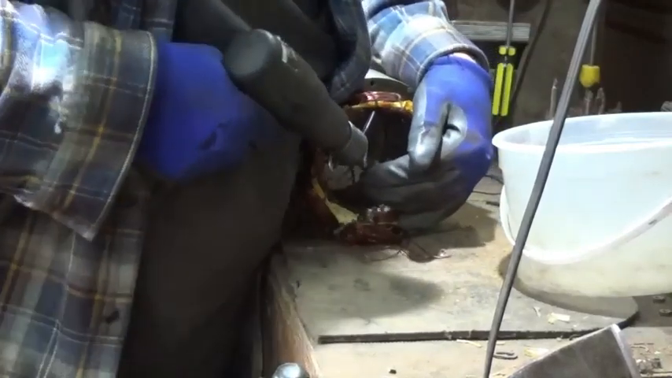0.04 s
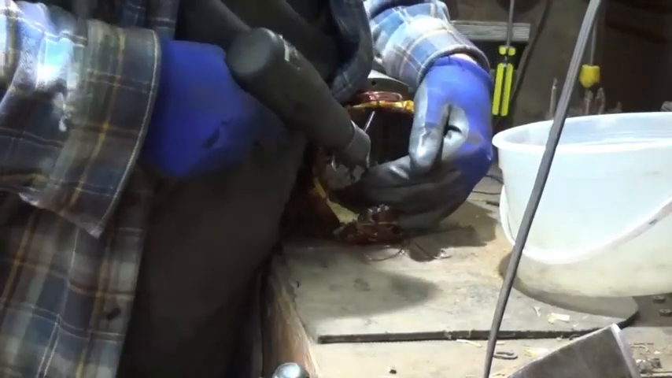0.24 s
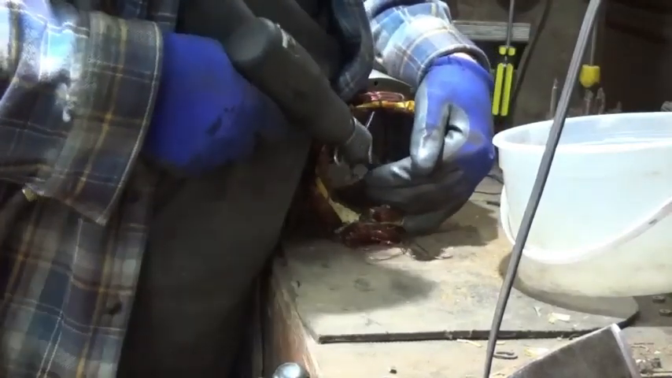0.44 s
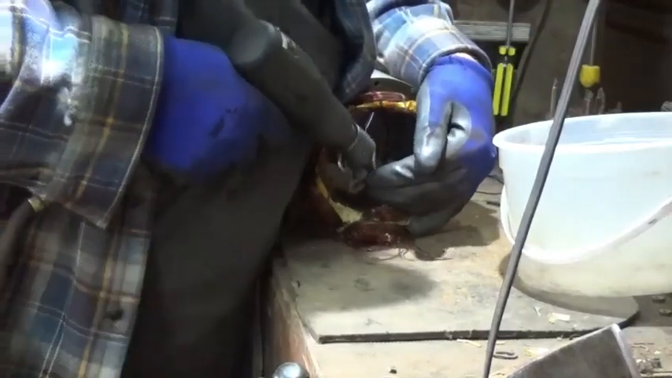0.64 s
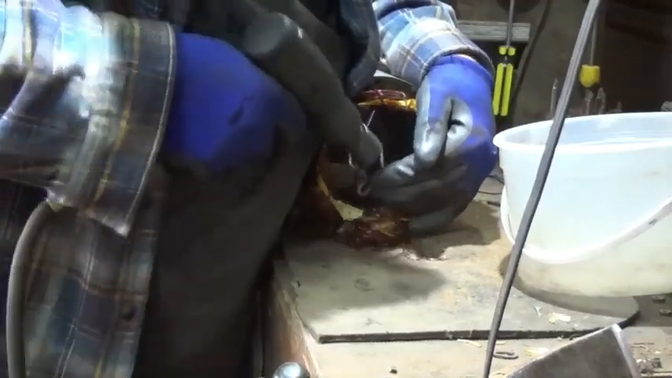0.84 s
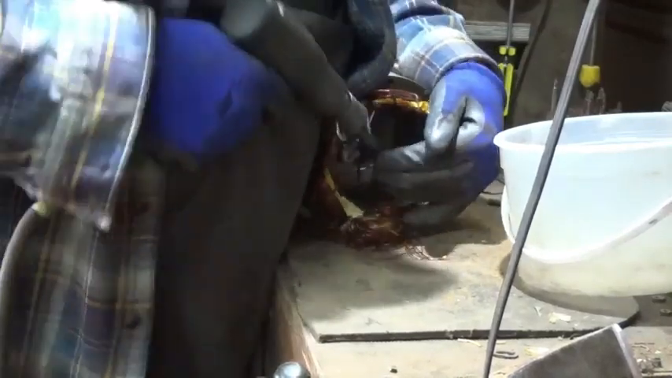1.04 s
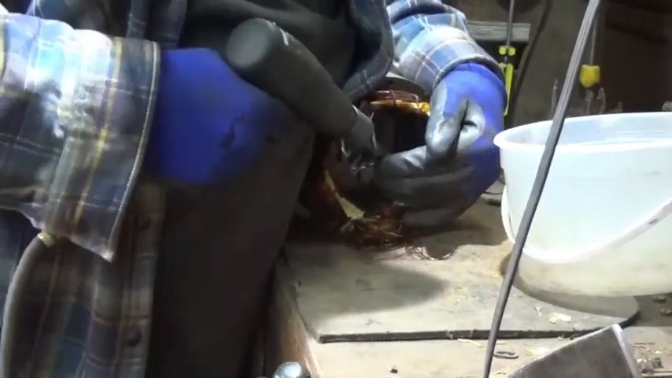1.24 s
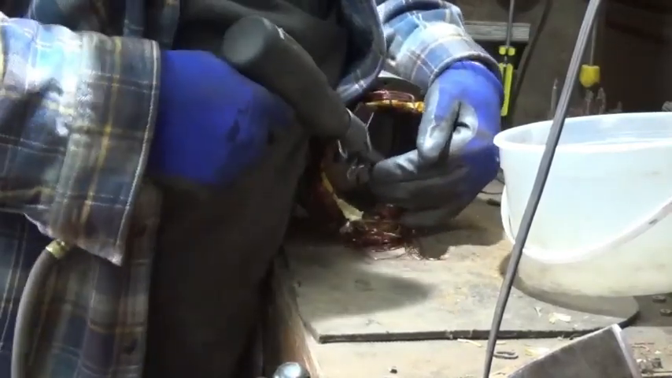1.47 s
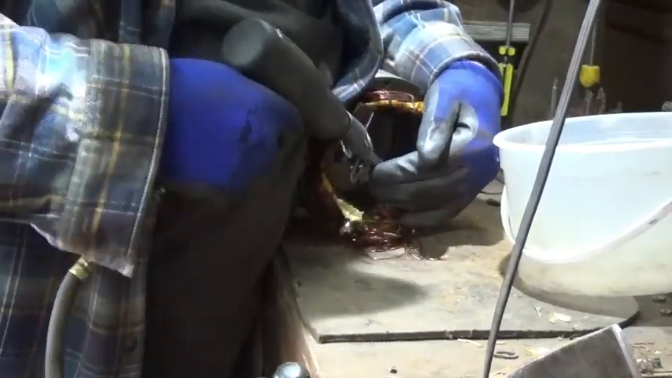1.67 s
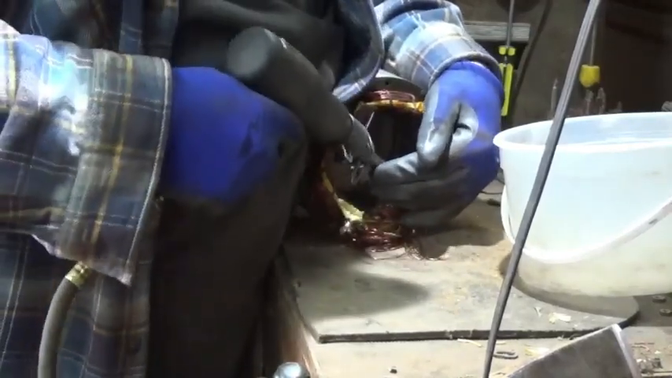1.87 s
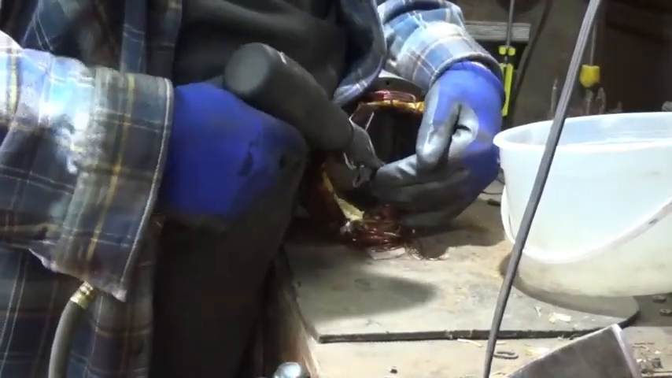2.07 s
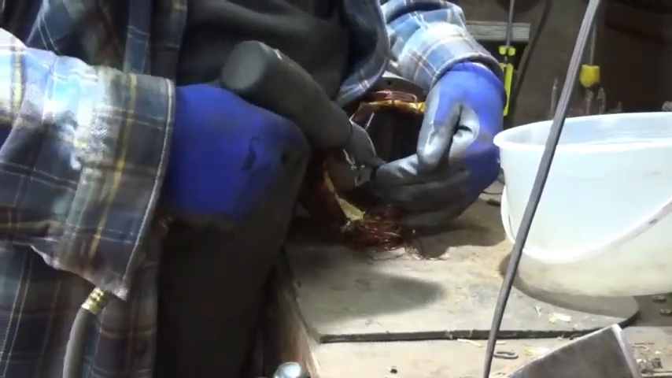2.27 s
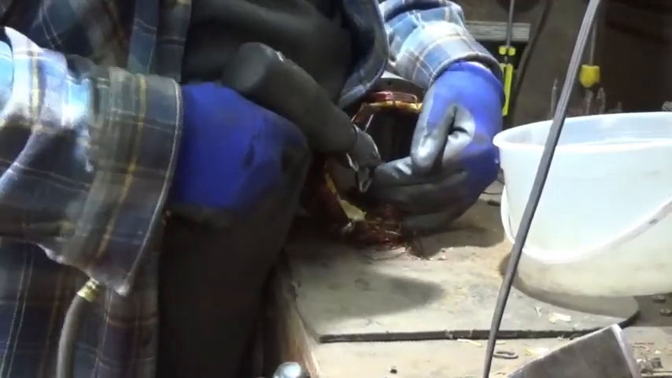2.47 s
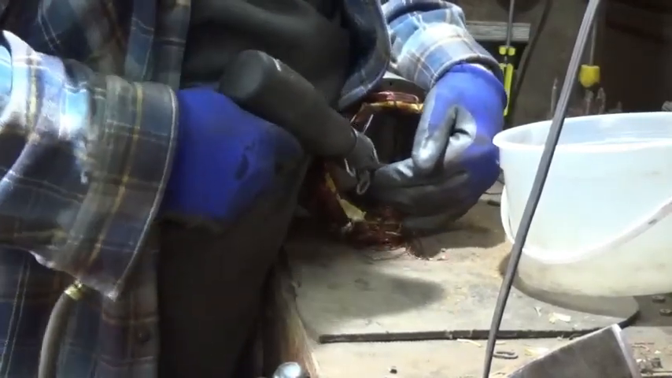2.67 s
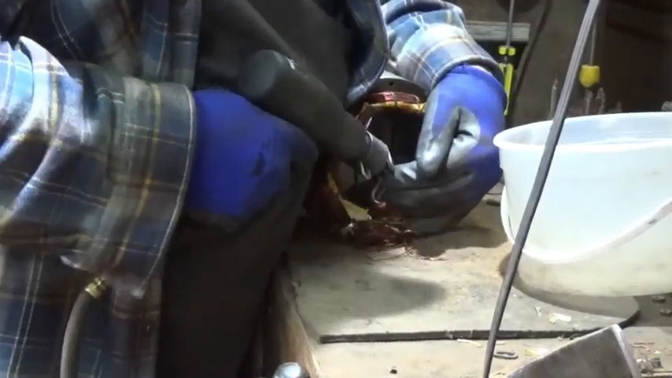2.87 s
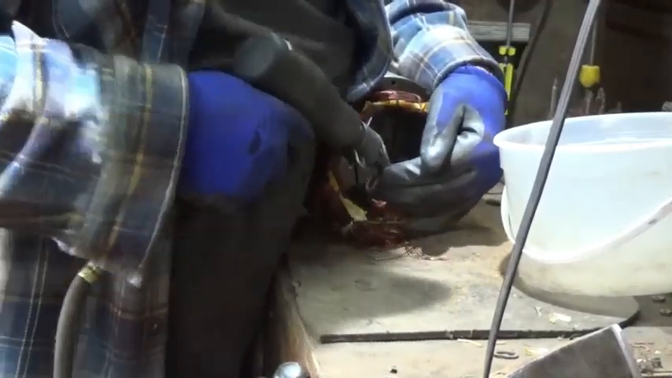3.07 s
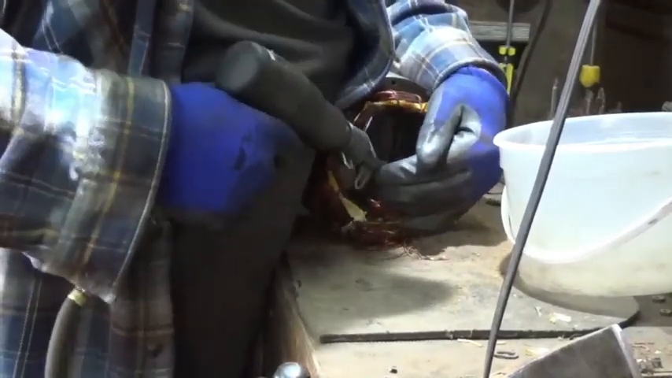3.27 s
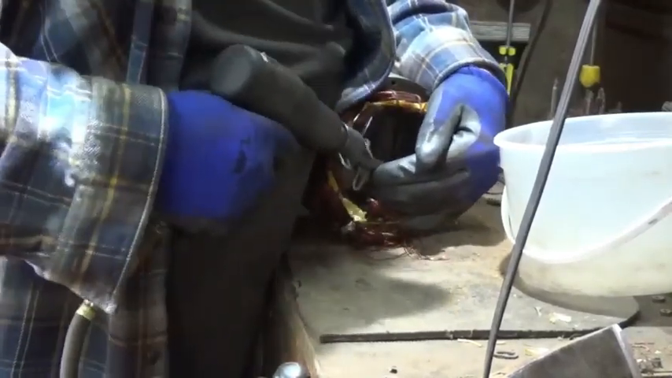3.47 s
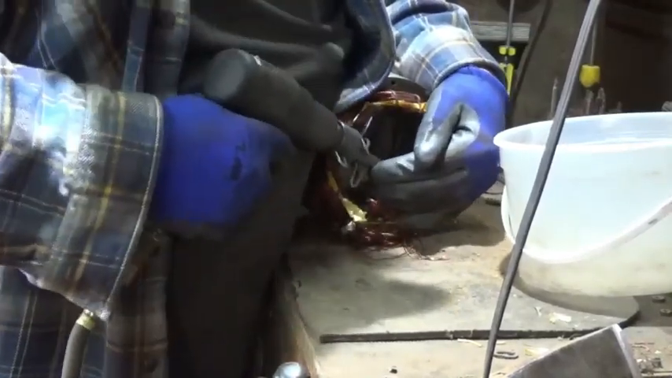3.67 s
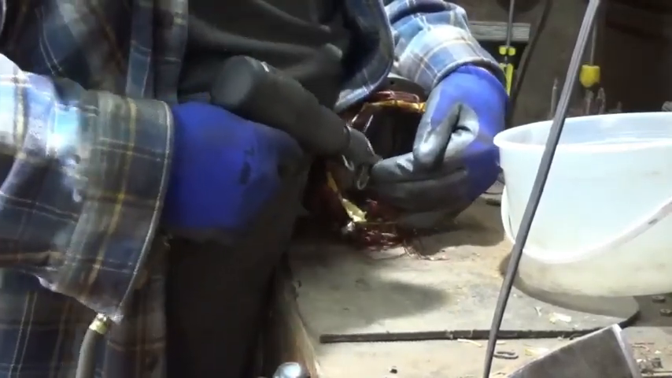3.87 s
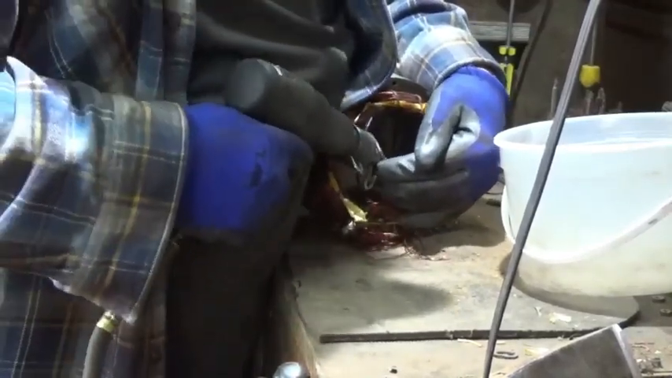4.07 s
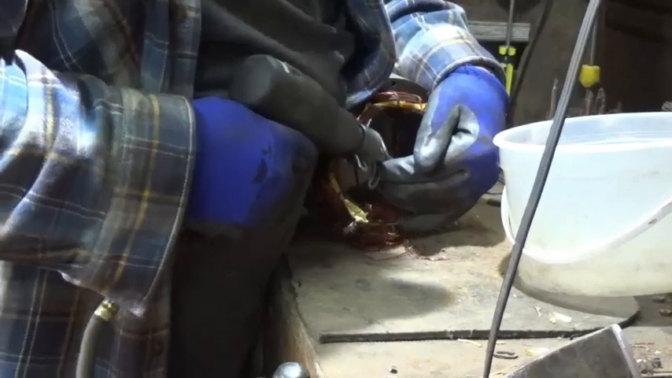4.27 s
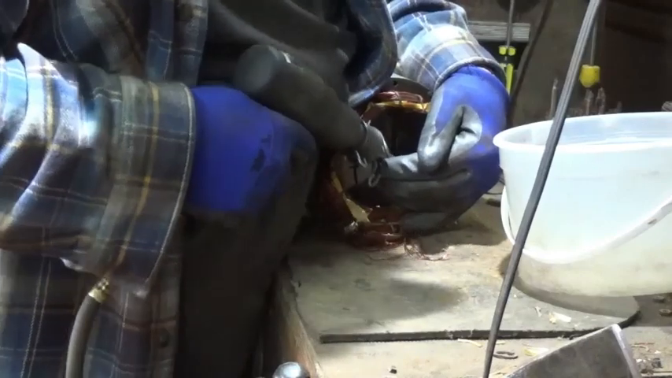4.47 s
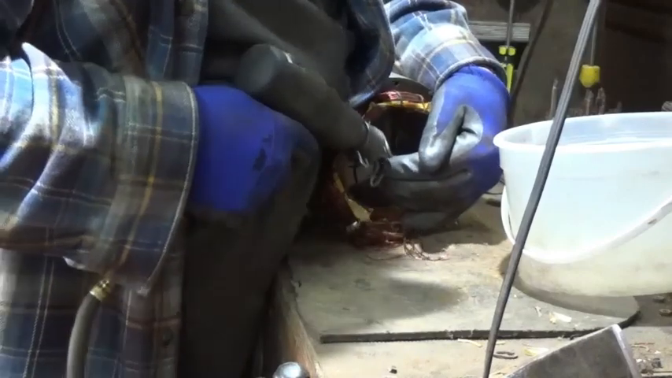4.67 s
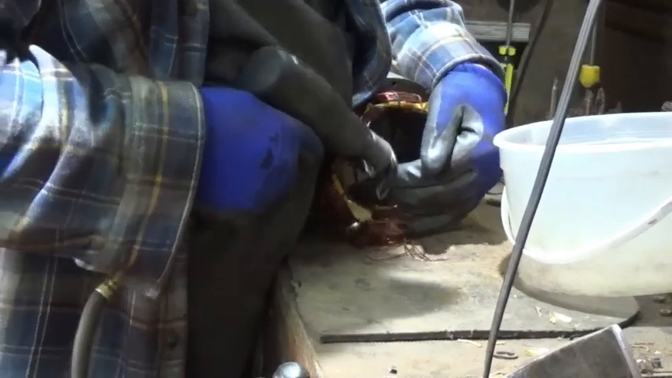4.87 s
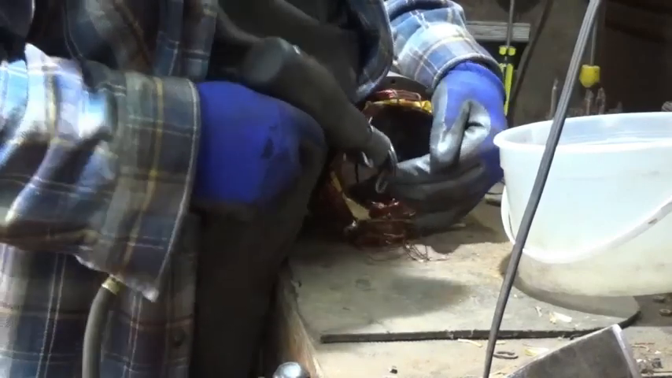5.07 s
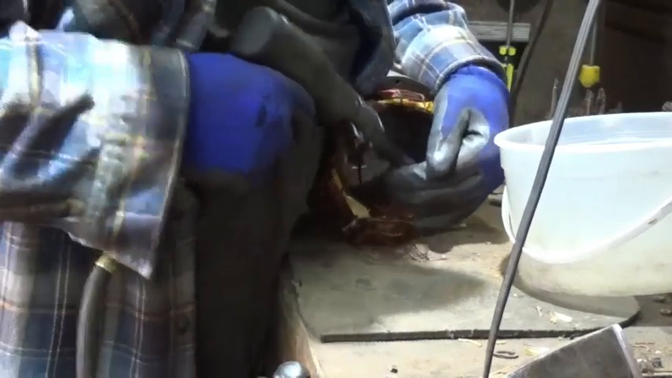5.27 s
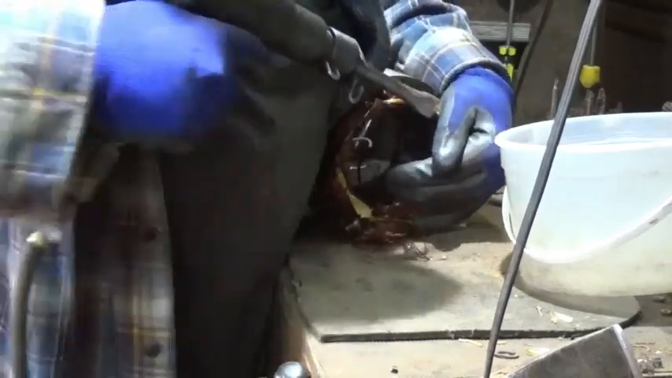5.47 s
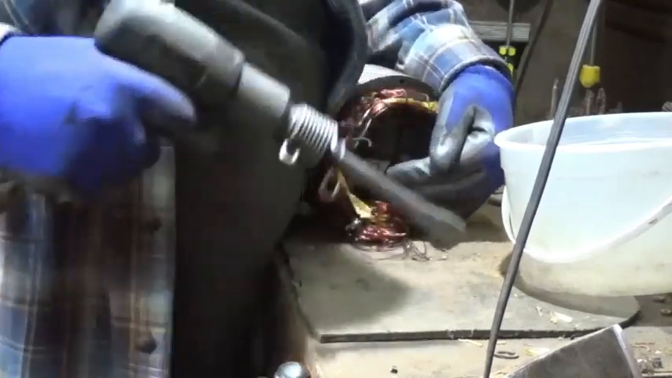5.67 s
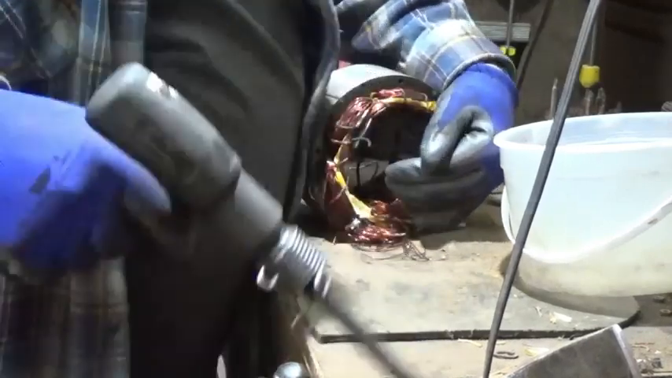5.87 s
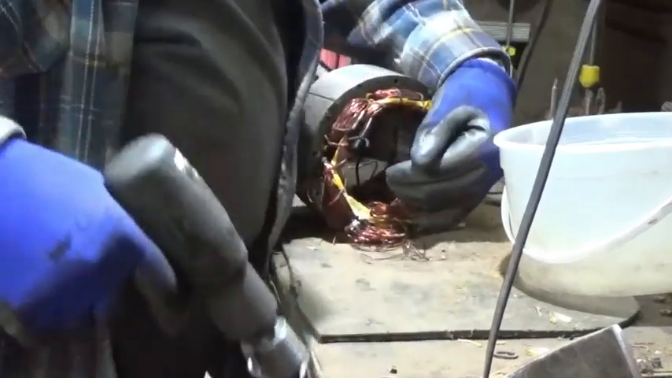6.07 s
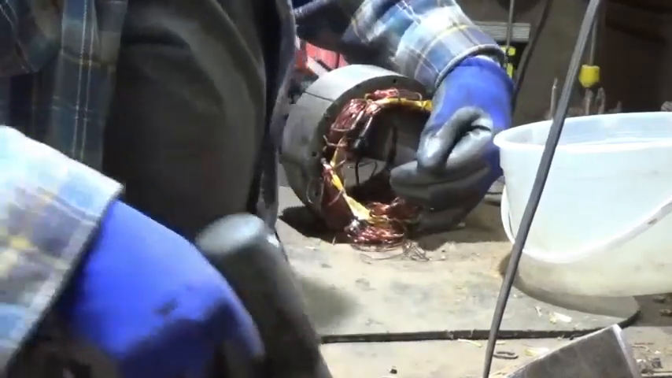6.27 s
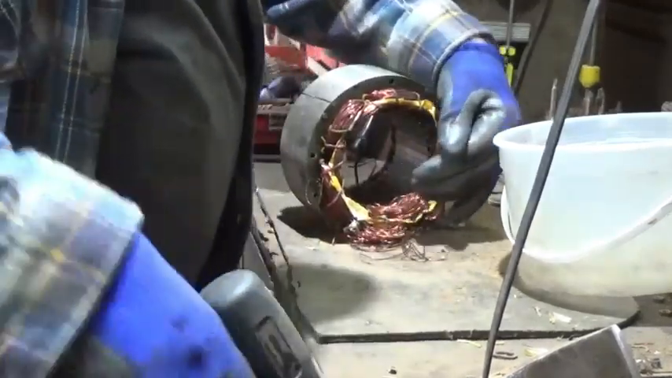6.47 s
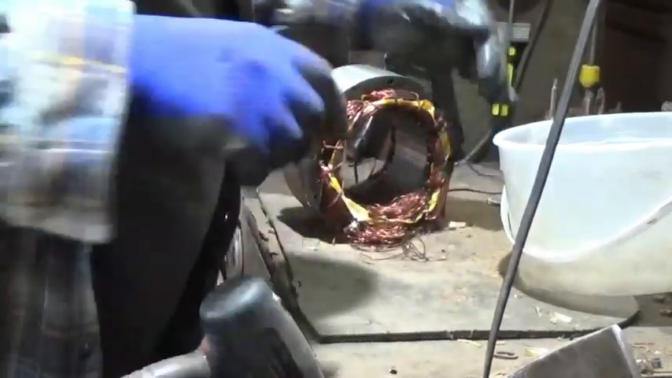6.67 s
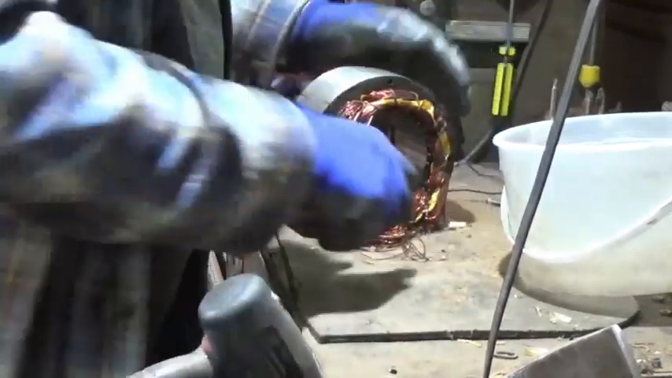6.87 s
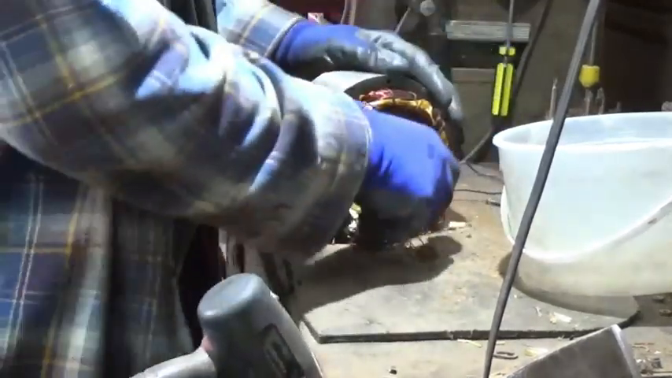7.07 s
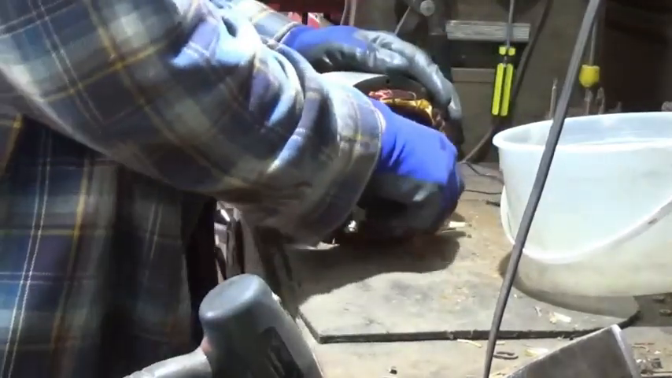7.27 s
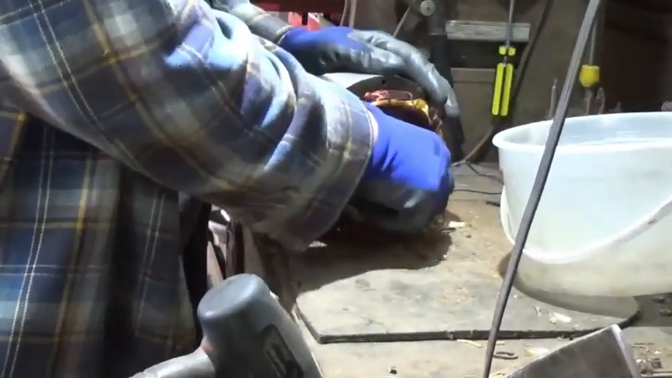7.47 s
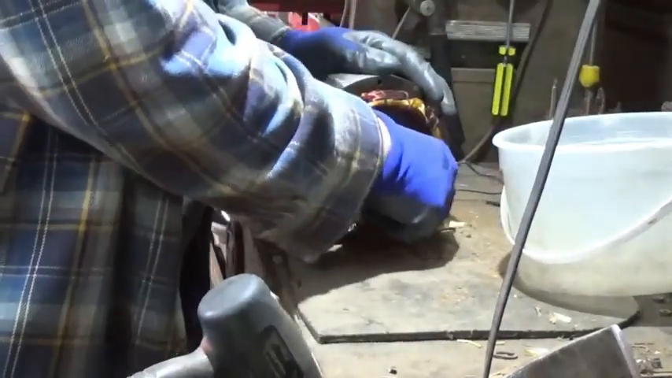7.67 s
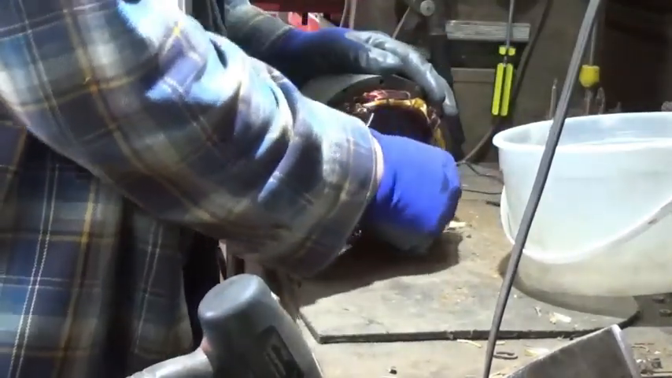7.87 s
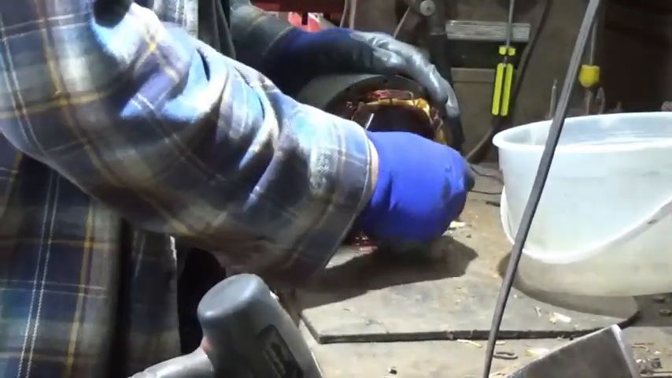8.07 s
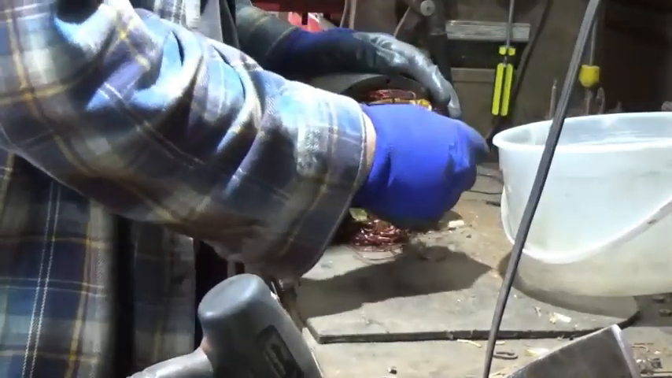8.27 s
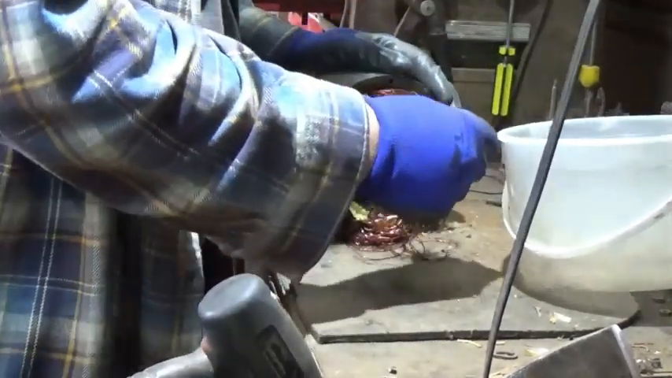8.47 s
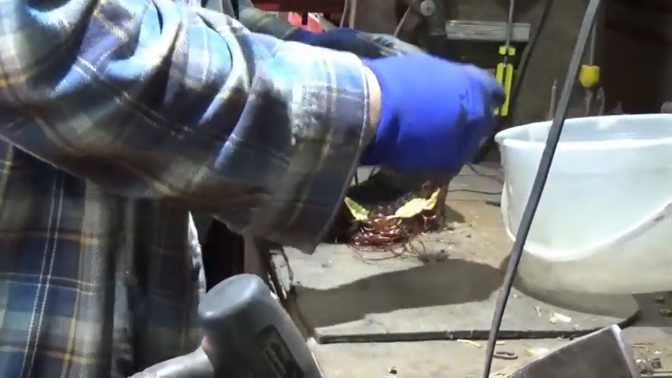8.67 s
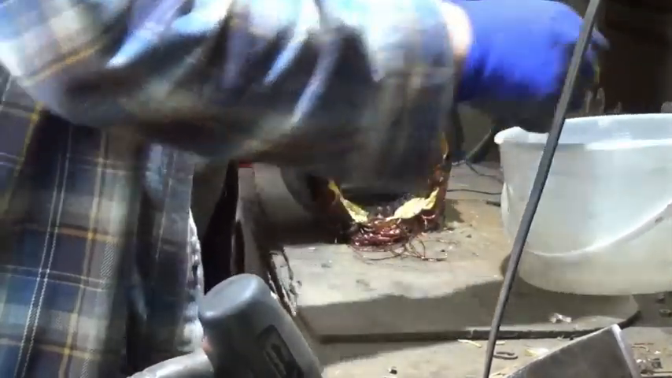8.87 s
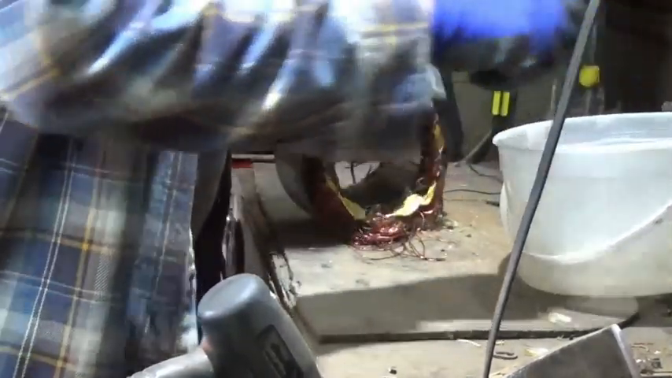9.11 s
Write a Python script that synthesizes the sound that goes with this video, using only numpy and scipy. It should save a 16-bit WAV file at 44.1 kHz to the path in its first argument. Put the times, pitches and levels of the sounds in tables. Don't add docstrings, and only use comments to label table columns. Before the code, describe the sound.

Close, slightly dull-topped capture at a workbench: a loud air chisel buzzes at about forty blows a second, first a long burst, then two short ones and another long one, each ending in a quick air sigh. Behind it a low, throbbing compressor with a thin whine swells steadily in the gaps. Later come hard tool knocks, a brief drag, dry wire rustling, and strands hitting a hollow plastic bucket.

```python
import sys
import numpy as np
from scipy import signal
from scipy.fft import rfft, irfft, next_fast_len
from scipy.io import wavfile
from scipy.ndimage import uniform_filter1d

SR = 44100
rng = np.random.default_rng(int(sys.argv[2]) if len(sys.argv) > 2 else 0)


def magnitude_from_level(level_db):
    exponent = np.asarray(level_db, float) / 20
    return 10 ** exponent


def to_wav(sig):
    pcm = np.clip(np.atleast_2d(sig), -1, 1) * 32767
    pcm = np.round(pcm).astype(np.int16)
    wavfile.write(sys.argv[1], SR, pcm.T)


N = 403074
T = np.arange(N) / SR

# pitch in Hz, level in dB.
FAN_HUM = [(97.5, -32), (195, -8)]
# multiple of crank speed, width in Hz, level in dB.
VALVE_WHINES = [(85, 170, -26.5), (152, 200, -30.5), (251, 220, -32.5)]
# frequency in Hz, level in dB per Hz.
COMPRESSOR_WASH = [(15, -39), (25, -23), (117, -21), (167, -11.5), (265, -3), (317, -10), (617, -12.5),
                   (862, -16.5), (2280, -24.5), (3630, -25), (3920, -24.5), (8900, -34.5), (10600, -43),
                   (11500, -54), (15000, -103), (22000, -120)]
CRANK_ORDERS = [-32, -18.5, -19, -8, 2.5, -2.5, -10, -7, -4, -11, -24, -7, -4.5, -11, -4, -15, -13, -8,
                -18.5, -26.5, -24, -23, -21.5, -17.5, -13.5, -15.5, -15, -20, -18, -22, -17, -23, -23, -28,
                -24, -28, -30, -26, -28, -25]
# frequency in Hz, width in Hz, depth in dB.
ROOM_NODES = [(137.1, 4.4, 17), (176.94, 7.9, 17), (205.6, 2.5, 13), (273, 4, 15), (318.7, 4.4, 14),
              (427, 5.5, 15), (448.3, 15.6, 11.5), (517.7, 8.4, 21), (591, 12, 20), (618.4, 10.5, 21),
              (850, 4.9, -1), (894, 12, 5), (925, 28, 11.5), (235.5, 3.1, 15)]
# frequency in Hz, width in Hz, depth in dB.
REED_ROOM_NODES = [(3627, 12, 20), (3597, 7, 18), (3586, 7, 9), (3561, 7, 16), (3496, 6, 12), (3575, 30, 2)]
# frequency in Hz, time to die by 60 dB in seconds.
ROOM_DECAY = [(200, 0.35), (1000, 0.25), (4000, 0.23), (10000, 0.12)]
# frequency in Hz, side minus mid in dB.
STEREO_WIDTH = [(60, -32), (140, -29.5), (350, -23.5), (830, -13.5), (2000, -10.5), (4810, -9.5),
                (11600, -1)]
# frequency in Hz, left minus right in dB.
STEREO_LEAN = [(60, 0.69), (220, 0.74), (830, 2), (3100, 0.6), (11600, 0.0)]
# time in seconds, peak level in dB, centre frequency in Hz.
GRIT_TICKS = [(0.8573, -27.5, 5800), (0.8833, -27, 9500), (0.967, -38, 5530), (1.261, -37, 5520),
              (1.3574, -35.5, 4200), (3.022, -30, 5860), (3.41, -36, 5320), (3.4296, -41, 5350),
              (5.237, -32, 5900), (7.5435, -27, 4840), (7.6256, -43, 8540), (7.6874, -36, 5060),
              (7.733, -34, 7050), (7.7624, -34, 5690), (7.7892, -35, 6190), (7.8251, -36, 6300),
              (7.86, -39, 5060), (7.9039, -36, 4530), (7.9794, -31, 5690), (8.0264, -34, 5290),
              (9.0803, -25, 4100)]
# time in seconds, level in dB.
WIRE_RUSTLE = [
    (7.45, -64),
    (7.532, -56),
    (7.542, -46),
    (7.568, -60),
    (7.752, -48.5),
    (8.032, -49.5),
    (8.072, -64),
    (8.29, -65),
    (8.3, -46),
]
# time in seconds, level in dB.
WIRE_DROP = [
    (8.982, -19),
    (8.992, -18.5),
    (9.022, -22),
    (9.046, -40.5),
    (9.14, -35),
]
# frequency in Hz, level in dB, time to die by 60 dB in seconds.
BUCKET_WALL = [(620, 6, 0.045), (960, 3, 0.48), (2060, -6, 0.33), (3000, -22, 0.23), (3560, -29, 0.45),
               (3600, -67, 0.16), (6000, -4, 0.11), (8705, -65, 0.13)]
# time in seconds, level in dB, ring in Hz.
TOOL_SCRAPE = [
    (6.13, -52, 2400),
    (6.208, -41.5, 2380),
    (6.28, -31, 2900),
    (6.305, -40, 3050),
    (6.32, -50, 3050),
]
# time in seconds, peak level in dB, weaker ring in Hz, stronger ring in Hz,
# bass over treble in dB.
TOOL_TAPS = [(2.316, -21.5, 9900, 5910, -28), (2.326, -16.5, 3300, 6090, -21),
             (2.332, -21, 3290, 6150, -23), (2.359, -33, 3040, 6100, -14), (3.039, -37.5, 3100, 5900, -9),
             (3.8497, -28.5, 6100, 6040, -30), (3.8907, -31, 3100, 5970, -17), (3.91, -37, 3030, 6070, -5),
             (5.1908, -43, 3320, 5360, -18), (5.1982, -39.5, 3540, 6060, -5),
             (5.2091, -35, 3000, 5500, -16), (6.0918, -18.5, 9850, 5680, -12),
             (6.1, -14.5, 5150, 2060, -6.5), (6.322, -27, 3900, 4360, -17), (6.323, -19, 6000, 2030, 6),
             (6.3413, -22, 2170, 4700, -5), (6.3574, -26, 2100, 5330, -9), (6.3937, -30, 5600, 6500, -6),
             (6.4094, -30.5, 6400, 3750, -7)]
# frequency in Hz, level in dB.
HANDLING_TONE = [(7000, 0), (9500, -2), (11000, -4.5)]
# air valve opens in seconds, first blow in seconds, last blow in seconds,
# steadiness of the grip from 0 to 1.
CHISEL_BURSTS = [
    (-.05, -.031, .043, .8),
    (.231, .2385, .7315, .97),
    (2.645, 2.658, 2.802, .8),
    (4.146, 4.160, 4.277, .8),
    (4.446, 4.46, 4.954, .7),
]
# treble in dB, shank ring over it in dB, casing thud over it in dB,
# tip resonance in Hz, first slam in dB.
TIP_BITE = [(-16, 1, -6, 4500, -30), (-17, 0.5, -7, 4500, -30), (-17.5, 2, -7.5, 4540, -8.5),
            (-17, 4.5, -6.5, 4680, -10.5), (-18.5, 7.5, -8, 4670, -3.5)]
# share of the cycle from 0 to 1, level in dB.
PISTON_CYCLE = [(0, 3.5), (.08, 3), (.14, 0), (.58, .5), (.66, -2.5), (.78, -2.5), (.84, -7), (1, -7)]
# frequency in Hz, level in dB per Hz.
EXHAUST_AIR = [(700, -20), (1500, -10), (1900, 2.5), (2400, -7), (3100, 1), (3700, -0.5), (4700, 3.5),
               (5500, 8), (6200, 6), (7200, 0.5), (8600, 3.5), (10200, -1.5), (12000, -10)]
# frequency in Hz, width in Hz, level in dB.
CASING_RINGS = [(1780, 97, -21.5), (1975, 60, -25), (3060, 460, -17.5)]
# frequency in Hz, level in dB.
BENCH_THUD = [(60, -37), (120, -17.5), (205, -7), (250, -13.5), (290, -8), (400, -15), (480, -3),
              (720, -2.5), (870, -7), (960, -12.5), (1150, -6), (1350, -14), (1600, -34), (2500, -43)]

LOADED_HZ, SAG_HZ, FILL_S = 33.75, 2.03, 5.3
UPPER_DB, UPPER_FALL_DB, UPPER_UNEVEN_DB = -31, .5, 4.5
REED, REED_BASE_HZ, REED_DB, REED_SIDE_DB = 93.5, 307, -16, -13
START_DB, DUCKED_DB, DUCK_S, RECOVER_DB_PER_S = -28, -41, 0.36, 3.0
LOUD_DB, LIMIT_DB = -31, 2
TAP_T60_S, DAMPING = .085, .45
BLOWS_PER_S, PING_DB_PER_S, PING_GLIDE, SLAM_T60_S = 40.5, 16, .12, 0.12
PRESSURE_DB_PER_S, SIGH_DB_PER_S, TAIL_S = -3, -250, 0.18
TIP_HZ_PER_S, FREE_TIP_HZ, LIFT_S = 790, 5060, .04
THUD_BUILD_S, THUD_START_DB, THUD_TAIL_DB_PER_S, EASE_SHARE, EASE_DB = .07, -4, 51, 0.24, -2.5
RING_BUILD_S, RING_START_DB, RING_DB_PER_S, LOOSE_DB_PER_S, RING_TAIL_DB_PER_S = 0.076, -9, -12, -88, 32


def evened(x):
    return x / np.sqrt(np.mean(x ** 2) + 1e-20)


def steady(x):
    return x / np.sqrt(uniform_filter1d(x ** 2, 2200) + 1e-3 * np.mean(x ** 2))


def read(points, hz):
    f, value = np.transpose(points)
    return np.interp(np.log(hz + 1), np.log(f + 1), value)


def add(mix, s, sound):
    part = mix[round(s * SR):][:len(sound)]
    part += sound[:len(part)]


def resonate(x, hz, width):
    turn = np.exp(2j * np.pi * np.cumsum(hz * np.ones(len(x))) / SR)
    r = np.exp(-np.pi * width / SR)
    return 2 * (turn * signal.lfilter([1 - r], [1, -r], x / turn + 1e-18)).real


def coloured(x, points):
    gain_db = read(points, abs(np.fft.fftfreq(2048, 1 / SR)))
    log_gain = np.log(magnitude_from_level(np.maximum(gain_db, -100)))
    taps = np.fft.ifft(np.exp(np.conj(signal.hilbert(log_gain)))).real
    return signal.oaconvolve(x, taps[:1024])[:len(x)]


def drift(per_s, count=N):
    knots = rng.standard_normal(int(count / SR * 400) + 2)
    knots = signal.lfilter([1], [1, -np.exp(-2 * np.pi * per_s / 400)], knots)
    return evened(np.interp(np.arange(count) / SR * 400, np.arange(len(knots)), knots))


def clicks(count, per_s, spread_db):
    size = magnitude_from_level(spread_db * np.minimum(rng.exponential(1, count), 4)) * rng.choice([-1, 1], count)
    return evened(size * (rng.random(count) < per_s / SR))


def stroked(rows, sound):
    s, db, *more = np.transpose(rows)
    t = np.arange(s[0], s[-1], 1 / SR)
    body = evened(sound(t, *(np.interp(t, s, column) for column in more)))
    return s[0], magnitude_from_level(np.interp(t, s, db)) * body * signal.windows.tukey(len(t), .04)


def shop(x):
    taps = np.zeros(SR // 2)
    places = np.arange(300, SR // 2 - 20, 20)
    taps[places] = rng.choice([-1., 1.], len(places))
    taps *= rng.random(len(taps))
    hz, t, z = signal.stft(np.roll(taps, 3) + taps * .5, SR, nperseg=256)
    tail = signal.istft(z * magnitude_from_level(-60 * t / read(ROOM_DECAY, hz)[:, None]), SR, nperseg=256)[1]
    return signal.oaconvolve(x, tail / np.linalg.norm(tail))[:N]


def node_db(hz, nodes):
    return sum(10 * np.log10(((hz - f) ** 2 + (w * magnitude_from_level(-db)) ** 2) / ((hz - f) ** 2 + w ** 2))
               for f, w, db in nodes)


def crank_tone(speed, turns):
    step = T[::64]
    phase = np.clip(np.arange(52) / 16, .35, 1) * rng.random(52)
    slip = np.clip((step - 2.5) / 4, 0, 1)
    upper = np.arange(52 - len(CRANK_ORDERS))
    upper_db = UPPER_DB - UPPER_FALL_DB * upper + UPPER_UNEVEN_DB * rng.standard_normal(len(upper))
    wander = [drift(2.5)[::64] for _ in range(4)]
    slide = [drift(.4)[::64] for _ in range(4)]
    tone, turn, spin = np.zeros(N), np.exp(2j * np.pi * turns), 1
    for k, db in enumerate(np.append(CRANK_ORDERS, upper_db)):
        fine_nodes = 2.6 * (k > 17) * np.roll(slide[k % 4], 450 * k)
        waver = 1.25 * np.roll(wander[k % 4], 450 * k)
        level = magnitude_from_level(db + node_db((k + 1) * speed[::64], ROOM_NODES) + waver + fine_nodes)
        spin = spin * turn
        slow = level * np.exp(2j * np.pi * phase[k] * (1 + slip))
        tone += (np.repeat(slow, 64)[:N] * spin).real
    return tone


def valve_reed(speed, turns):
    waver = 0.13 * drift(20)
    reed = np.zeros(N)
    for k in (-1, 0, 1):
        loss = node_db((REED + k) * speed + REED_BASE_HZ, REED_ROOM_NODES)
        cycles = (REED + k) * turns + REED_BASE_HZ * T
        reed += magnitude_from_level(REED_DB + abs(k) * REED_SIDE_DB + 2.5 * k + loss) * np.cos(2 * np.pi * cycles + waver)
    return reed


def compressor(level_db):
    speed = LOADED_HZ + SAG_HZ * np.exp(-T / FILL_S)
    turns = np.cumsum(speed * (1 + 0.00047 * drift(3.1))) / SR + .2
    tone = crank_tone(speed, turns)
    tone += sum(magnitude_from_level(db + 1.0 * drift(2.1)) * np.cos(2 * np.pi * hz * T) for hz, db in FAN_HUM)
    tone /= np.sqrt(uniform_filter1d(tone ** 2, SR))
    puff = 1 + 0.093 * np.cos(2 * np.pi * turns)
    wash = puff * magnitude_from_level(0.35 * drift(9.8)) * evened(coloured(rng.standard_normal(N), COMPRESSOR_WASH))
    stroke = 1 + .5 * np.cos(2 * np.pi * turns + 2.8)
    whine = sum(magnitude_from_level(db) * evened(resonate(rng.standard_normal(N), k * speed, w)) for k, w, db in VALVE_WHINES)
    return magnitude_from_level(level_db) * (magnitude_from_level(-1.0) * tone + magnitude_from_level(-9.5) * wash + stroke * whine + valve_reed(speed, turns))


def drone_db(bench):
    power = uniform_filter1d(bench ** 2, 441)[::441]
    loud = np.clip((10 * np.log10(abs(power) + 1e-12) - LOUD_DB) / 6, 0, 1)
    db = [START_DB]
    for share in loud[:-1]:
        pull = share * (db[-1] - DUCKED_DB) / DUCK_S
        db.append(db[-1] + .01 * (RECOVER_DB_PER_S - pull))
    return np.interp(T, T[::441], db - LIMIT_DB * loud)


def tick(db, hz):
    t = np.arange(1500) / SR
    snap = rng.standard_normal(len(t)) * (magnitude_from_level(-60 * t / 0.011) + 0.095 * magnitude_from_level(-60 * t / 0.1))
    return magnitude_from_level(db - 0.5) * resonate(resonate(snap, hz, 4100), 8900, 6600)


def rustle(t):
    return resonate(clicks(len(t), 1500, 2.6) * magnitude_from_level(3.2 * drift(30, len(t))), 6000, 3600)


def drop(t):
    shower = clicks(len(t), 7000, 2.3)
    wall = sum(magnitude_from_level(db) * evened(resonate(shower, hz, 6 / t60 + 60)) for hz, db, t60 in BUCKET_WALL)
    return evened(wall) + 1.3 * evened(resonate(resonate(shower, 2830, 3850), 2500, 8200))


def scrape(t, hz):
    slips = clicks(len(t), 3000, 3.0)
    rings = ((hz, 450, .7), (1300, 900, 1.1), (2300, 350, .6), (4200, 700, .7), (5100, 500, .6),
             (6200, 700, .35), (8900, 700, .35))
    return sum(g * evened(resonate(resonate(slips, f, w), f, 3 * w)) for f, w, g in rings)


def tap(db, weak_hz, strong_hz, bass_db):
    t = np.arange(9000) / SR
    t60 = TAP_T60_S * magnitude_from_level(-DAMPING * (bass_db + 17))
    jolt = rng.standard_normal((3, len(t)))
    crack = resonate(jolt[0], 5000, 4700) * (magnitude_from_level(-60 * t / 0.024) + 0.18 * magnitude_from_level(-60 * t / (2.4 * t60)))
    chatter = jolt[1] * (magnitude_from_level(-60 * t / 0.022) + 0.12 * magnitude_from_level(-60 * t / t60))
    rings = sum(g * resonate(resonate(chatter, hz, 3.4 / t60 + 200), hz, 1000)
                for hz, g in ((weak_hz, 5), (strong_hz, 8), (8900, 2.5), (4400, 1.6)))
    knock = resonate(resonate(jolt[2], 560, 1900), 1700, 2200) * magnitude_from_level(-60 * t / 0.15)
    knock -= uniform_filter1d(knock, 200)
    return magnitude_from_level(db) * (0.86 * crack + rings + magnitude_from_level(bass_db + 2) * knock) * np.clip(t / 0.00039, 0, 1)


def effort(t, first, last, grip, level_db, ring_db, thud_db, tip_hz):
    held = np.clip(t, first, last) - first
    after = np.maximum(t - last, 0)
    level_db = level_db + PRESSURE_DB_PER_S * held + SIGH_DB_PER_S * after
    ring_db = ring_db + RING_START_DB * np.clip(1 - held / RING_BUILD_S, 0, 1)
    ring_db += (RING_DB_PER_S + LOOSE_DB_PER_S * (1 - grip)) * held + RING_TAIL_DB_PER_S * after
    thud_db = thud_db + THUD_START_DB * np.clip(1 - held / THUD_BUILD_S, 0, 1)
    thud_db += EASE_DB * np.clip(1 + (held / (last - first) - 1) / EASE_SHARE, 0, 1)
    thud_db += THUD_TAIL_DB_PER_S * after
    tip_hz = tip_hz + TIP_HZ_PER_S * held
    tip_hz += (FREE_TIP_HZ - tip_hz) * np.clip(after / LIFT_S, 0, 1)
    return level_db, ring_db, thud_db, tip_hz


def exhaust_and_steel(drive, ping, tip_hz):
    treble = evened(coloured(drive, EXHAUST_AIR))
    treble += sum(magnitude_from_level(db) * evened(resonate(drive, hz, w)) for hz, w, db in CASING_RINGS)
    return treble + magnitude_from_level(-9.5) * evened(resonate(resonate(drive + ping, tip_hz, 500), tip_hz, 890))


def shank_ring(drive):
    pair = evened(resonate(drive, 5986, 80) + .8 * resonate(drive, 6140, 83))
    return pair * magnitude_from_level(2.0 * drift(25, len(drive)))


def bench_thud(t, first, last, grip, blow, air, span):
    echoes = rng.standard_normal(4000)[:span] * magnitude_from_level(-60 * np.arange(span) / SR / .11)
    echoes = irfft(rfft(echoes) / abs(rfft(echoes)), span)
    alike = evened(signal.oaconvolve(blow, echoes)[:len(t)])
    shake = grip * alike + np.sqrt(1 - grip ** 2) * rng.standard_normal(len(t))
    thud = coloured(shake, BENCH_THUD) * np.clip((t - first - .012) / 0.0072, 0, 1)
    settle = np.clip((t - last + 0.045) / 0.026, 0, 1)
    return evened(thud) + 0.76 * settle * evened(resonate(resonate(air, 310, 120), 310, 300))


def burst(valve, first, last, grip, bite):
    t = np.arange(max(valve, 0), last + TAIL_S, 1 / SR)
    blows = round((last - first) * BLOWS_PER_S) + 1
    treble_db, ring_db, thud_db, tip_hz = effort(t, first, last, grip, *bite[:-1])
    at = np.linspace(first, last, blows)
    at[1:-1] += .0006 * (1 - grip) * rng.standard_normal(blows - 2)
    cycle = np.interp(t, at, np.arange(blows), left=-1)
    running = (t >= first) & (t < last + .004)
    blow = np.append(0, np.diff(np.floor(cycle)) > 0)
    hit = blow * magnitude_from_level(1.3 * rng.standard_normal(len(t)))
    stroke = np.where(running, magnitude_from_level(np.interp(cycle % 1, *np.transpose(PISTON_CYCLE))), .8)
    tip_hz = tip_hz * (1 + PING_GLIDE * running * (np.clip(cycle % 1 / 0.24, 0, 1) - .5))
    rattle = running * stroke * clicks(len(t), 1100, 3.5)
    air = stroke * rng.standard_normal(len(t))
    drive = magnitude_from_level(-7) * air + magnitude_from_level(-10.0) * rattle + magnitude_from_level(13) * hit
    ping = magnitude_from_level(26 + PING_DB_PER_S * (t - first)) * hit
    treble = exhaust_and_steel(drive, ping, tip_hz)
    span = round(3 * SR * (last - first) / (blows - 1))
    thud = bench_thud(t, first, last, grip, blow, air, span)
    slam = (t >= first) * magnitude_from_level(bite[-1] - 60 * abs(t - first) / SLAM_T60_S) * evened(coloured(air, BENCH_THUD))
    mix = magnitude_from_level(-1.5) * steady(treble) + magnitude_from_level(ring_db - 6.5) * steady(shank_ring(drive))
    mix += magnitude_from_level(thud_db) * steady(thud) + slam
    opening = np.where(t < first, magnitude_from_level(-3.5) * (abs(t - valve) / (first - valve)) ** .35, 1)
    return t[0], magnitude_from_level(treble_db - 0.85) * opening * mix * np.clip((t[-1] - t) / 0.072, 0, 1)


def scene():
    bench = np.zeros(N)
    for s, *row in GRIT_TICKS:
        add(bench, s, tick(*row))
    for rows, sound in ((WIRE_RUSTLE, rustle), (WIRE_DROP, drop), (TOOL_SCRAPE, scrape)):
        add(bench, *stroked(rows, sound))
    for s, *row in TOOL_TAPS:
        add(bench, s, tap(*row))
    bench = coloured(bench, HANDLING_TONE)
    for when, bite in zip(CHISEL_BURSTS, TIP_BITE):
        add(bench, *burst(*when, bite))
    mid = bench + magnitude_from_level(-10.0) * shop(bench) + compressor(drone_db(bench))
    size = next_fast_len(N, True)
    hz, direct = np.fft.rfftfreq(size, 1 / SR), rfft(mid, size)
    side = magnitude_from_level(read(STEREO_WIDTH, hz)) * (.15j * direct + rfft(shop(mid), size))
    lean = magnitude_from_level(read(STEREO_LEAN, hz) / 2)
    return irfft(np.array([(direct + side) * lean, (direct - side) / lean]), size)[:, :N]


def low_pass(x):
    return signal.sosfilt(signal.butter(12, 12170, fs=SR, output="sos"), x)


def record(dry):
    limited = .7 * np.tanh(dry / .7)
    edge = signal.firwin(767, 11080, window=("kaiser", 8), fs=SR)
    return low_pass(signal.oaconvolve(limited, edge[None], "same"))


dry = scene()
out = record(dry)
to_wav(out)
```